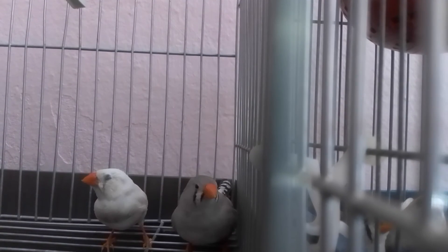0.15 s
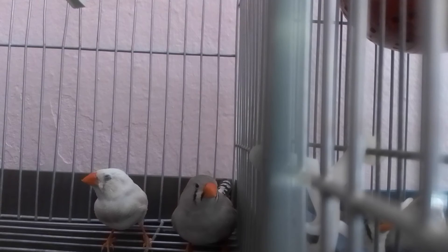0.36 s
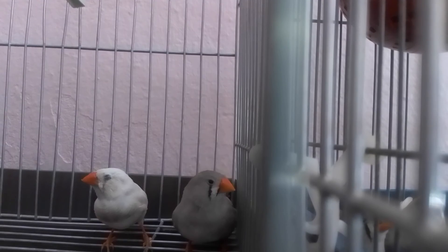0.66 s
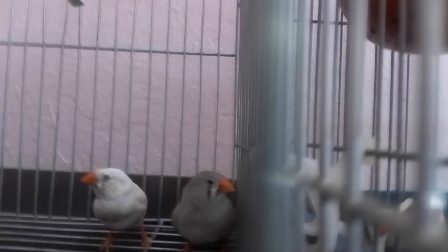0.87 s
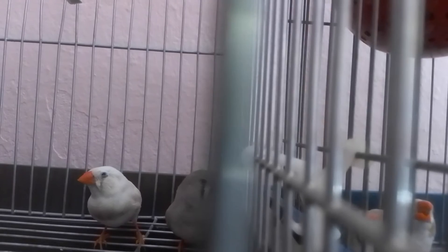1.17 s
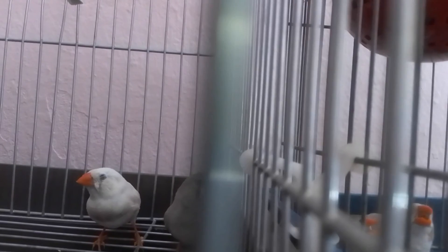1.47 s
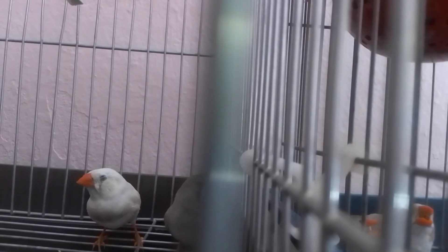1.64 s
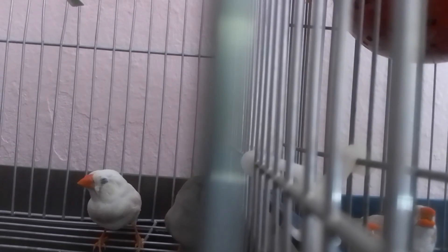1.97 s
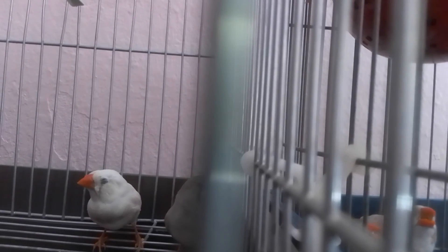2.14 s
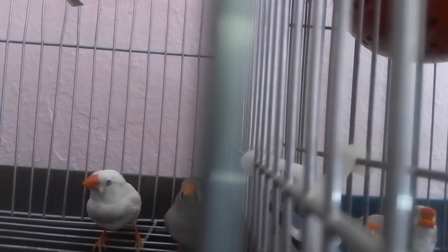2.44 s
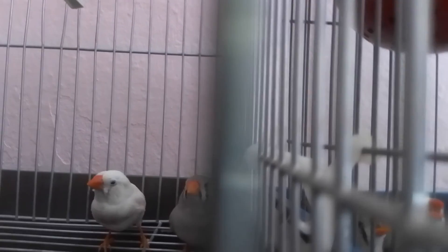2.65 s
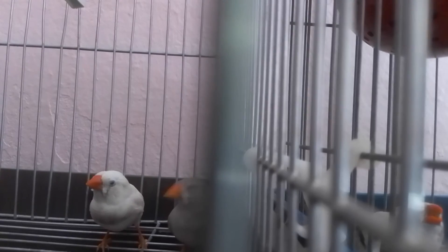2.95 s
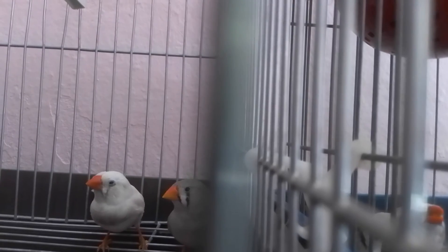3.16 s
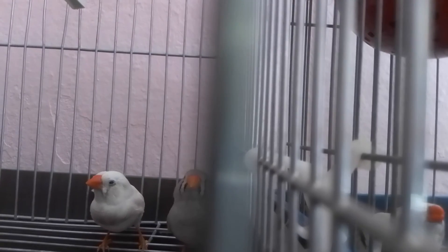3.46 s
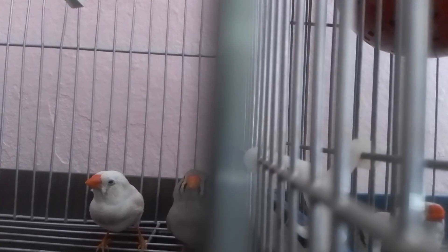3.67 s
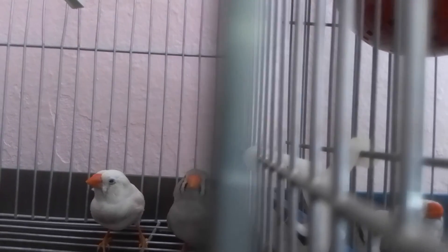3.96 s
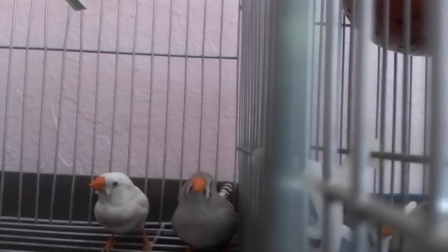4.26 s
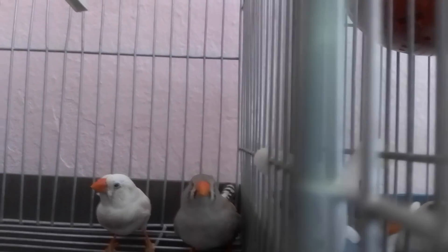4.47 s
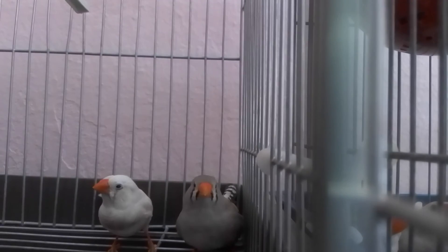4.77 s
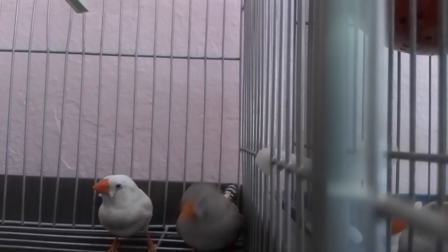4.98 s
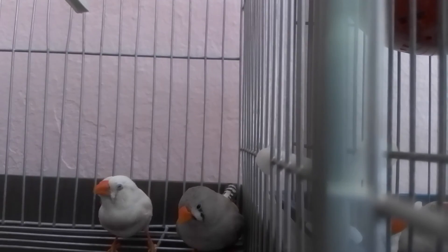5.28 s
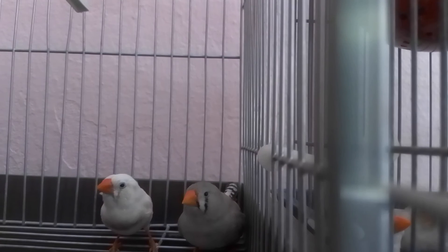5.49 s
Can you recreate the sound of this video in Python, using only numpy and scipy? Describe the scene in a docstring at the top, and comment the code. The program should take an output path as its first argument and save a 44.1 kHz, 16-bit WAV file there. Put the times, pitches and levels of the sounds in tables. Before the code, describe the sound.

Zebra finches in a cage call inside a small, echoing room. A nasal chirp is cut off at the start, then faint peeps and hoarse buzzes come from further away. A chirp near two seconds leads into a cluster of rasps; more separate chirps follow, and a loud close call ends it. Steady soft hiss and low rumble lie underneath.

```python
"""Zebra finches in a cage in a small, hard-walled room, over steady noise, a swelling rumble and a brief hum.
A short nasal chirp is already sounding at the start; then thin peeps and hoarse, buzzy calls come from further off.
A chirp near 2 s leads to a cluster of peeps and hoarse calls, with a soft rush of noise behind them.
Three more chirps follow, with a peep and a hoarse call between, and one long, loud call close by ends the scene.
Calls are syrinx pulses on a moving pitch, coloured by throat and beak; peeps are pairs of rasping tones."""
import sys
import numpy as np
from scipy import signal
from scipy.fft import rfft, irfft, next_fast_len
from scipy.io import wavfile
from scipy.ndimage import uniform_filter1d, map_coordinates

SR = 44100
rng = np.random.default_rng(int(sys.argv[2]) if len(sys.argv) > 2 else 0)


def dump(signal):
    """Clip the signal to [-1, 1] and save it as 16-bit WAV at the path in sys.argv[1]."""
    limited = np.clip(np.atleast_2d(signal).T, -1, 1)
    pcm = np.round(limited * 32767).astype(np.int16)
    wavfile.write(sys.argv[1], SR, pcm)


N = 247842  # length in samples

# The short chirps. Each row: start in seconds, lead-in in seconds, length in seconds, pitch in Hz,
# sag of the pitch in Hz per second, level in dB, lead-in level in dB relative to that, base roughness 0-1,
# delay of the shrill flare in seconds, flare in dB, whistle lift in dB, spread of the pulses in radians,
# cage echoes in dB, room ring in dB (both relative to the direct sound's gain).
CHIRP_ROWS = [(-.045, .015, 0.065, 567, 403, -33, -8, 0.28, 0.014, -1, 7, 1.4, -4.5, -9),
              (1.96, 0.022, 0.053, 549, 4, -39.5, -7, 0.22, .007, 32.5, 8.5, 3.3, 3.5, -11),
              (3.164, 0.021, .06, 580.7, -260, -31, -13.5, 0.15, 0.032, 12.5, 8, 1.75, -4, -13),
              (4.33, 0.014, 0.072, 567.7, 222, -33, -9.5, 0.21, .019, 22, 0, 1.4, -8, -11.5),
              (5.004, 0.016, 0.073, 577.2, 498, -36.5, -7.5, 0.13, 0.041, 24, 24, 1.4, -8.5, -12)]
# Throat and beak, one table for each chirp. Each row: number of the harmonic, its relative level in dB.
CHIRP_THROAT_1 = [(1, -46.5), (2, -43.5), (3, -23.5), (4, -16.5), (5, -24.5), (6, -19), (7, -15.5),
                  (8, -9.5), (9, -23), (10, -28.5), (11, -26), (12, -28), (13, -35), (14, -42), (15, -44),
                  (16, -41)]
CHIRP_THROAT_2 = [(1, -56), (2, -60), (3, -24), (4, -3.5), (5, -8.5), (6, -8), (7, -5.5), (8, 4), (9, -20),
                  (10, -21), (11, -22), (12, -31), (13, -36), (14, -43)]
CHIRP_THROAT_3 = [(1, -41.5), (2, -23), (3, -21), (4, -16), (5, -12.5), (6, -22), (7, -5), (8, -25),
                  (9, -24), (10, -31), (11, -37), (12, -34.5), (13, -31.5), (14, -46), (15, -46), (16, -55)]
CHIRP_THROAT_4 = [(1, -34), (2, -31), (3, -17), (4, -9), (5, -7.5), (6, -11.5), (7, -0.5), (8, 2),
                  (9, -12.5), (10, -8), (11, -6.5), (12, -8), (13, -16), (14, -26.5), (15, -34), (16, -36),
                  (17, -32)]
CHIRP_THROAT_5 = [(1, -51), (2, -20.5), (3, -4.5), (4, -0.5), (5, -3.5), (6, -7.5), (7, 1.5), (8, -1),
                  (9, -8.5), (10, -8), (11, -34), (12, -50), (13, -37), (14, -44), (15, -32), (16, -30)]
CHIRP_THROATS = (CHIRP_THROAT_1, CHIRP_THROAT_2, CHIRP_THROAT_3, CHIRP_THROAT_4, CHIRP_THROAT_5)
ONSET_S, ONSET_DB, SWELL_S = 0.013, -18, 0.016  # how the level comes up
RELEASE_S, RELEASE_DB = 0.016, 17  # how long the ending lasts and how far the level falls
RISE_S, SCOOP, DROP = 0.034, 0.19, 0.095  # time of the pitch scoop; scoop and final drop as shares of the pitch
EDGE_ROUGH = 1.9  # extra roughness while the voice starts and stops, as a multiple
SHRILL_DB, END_FLARE_DB, FLARE_S = -7.5, 14.5, 0.011  # upper resonance at rest, its end flare, flare width
DIP_DB, DIP_BEFORE_S, DIP_WIDTH_S = 5, 0.011, 0.0059  # the voice slackens just before its last push


def chirps():
    """Each chirp scoops up in pitch through a soft lead-in, comes to full voice, then drops away."""
    track = np.zeros(N)
    for row, throat in zip(CHIRP_ROWS, CHIRP_THROATS):
        (start, lead, length, hz, sag, db, lead_db, rough,
         flare_s, flare_db, whistle_db, smear, near_db, tail_db) = row
        # a start before zero means the chirp is already under way
        t = np.arange(max(-start, 0), length + RELEASE_S, 1 / SR)
        rising = 1 - ease(t / RISE_S)
        release = np.maximum(t - length, 0) / RELEASE_S

        pitch = hz - sag * np.maximum(t - RISE_S, 0)
        pitch = pitch * (1 - SCOOP * rising - DROP * release)

        level_db = db + ONSET_DB * (1 - ease(t / ONSET_S))
        level_db = level_db + lead_db * (1 - ease((t - lead) / SWELL_S))
        level_db = level_db - RELEASE_DB * release
        level_db = level_db - DIP_DB * bell(t, length - DIP_BEFORE_S, DIP_WIDTH_S)

        shrill_db = SHRILL_DB + flare_db * bell(t, flare_s, FLARE_S)
        shrill_db = shrill_db + END_FLARE_DB * ease((t - length) / FLARE_S + .5)
        roughness = rough * (1 + EDGE_ROUGH * (rising + release))
        voice = call(start, pitch, level_db, roughness, shrill_db, throat, whistle_db, smear)
        track += in_room(voice, near_db, tail_db)
    return track


# The path of the long call. Each row: time in seconds, pitch in Hz, level in dB.
LONG_CALL_PATH = [(5.384, 542, -36), (5.394, 637, -26), (5.4, 662, -27), (5.422, 693, -23.5),
                  (5.476, 706.5, -23.5), (5.54, 681.4, -24.5), (5.598, 650.6, -29.5), (5.604, 584, -28),
                  (5.612, 558, -41)]
# Its throat and beak. Each row: number of the harmonic, its relative level in dB.
LONG_CALL_THROAT = [(1, -25), (2, -18.5), (3, -28.5), (4, -20.5), (5, -8.5), (6, -9), (7, 0), (8, -4.5),
                    (9, -13), (10, -22.5), (11, -34.5), (12, -34.5), (13, -44.5), (14, -49), (15, -40.5),
                    (16, -54), (17, -48.5), (18, -44), (19, -40), (20, -55), (21, -54)]


def long_call(attack_s=0.0052, onset_db=-16, flare_at_s=0.012, flare_width_s=0.0039, flare_db=26,
              rest_db=-3, crest_db=14, crest_width_s=0.031, rough=0.032, flare_rough=0.52, slack_rough=0.4):
    """The close, loud call: a rough, shrill flare at the start, then a cleaner arch, brightened at its crest."""
    s, hz, db = np.transpose(LONG_CALL_PATH)
    t = np.arange(s[0], s[-1], 1 / SR)
    pitch = np.interp(t, s, hz)

    edges = ease((t - s[0]) / attack_s) * ease((s[-1] - t) / attack_s)
    level_db = np.interp(t, s, db) + onset_db * (1 - edges)

    flare = bell(t, s[0] + flare_at_s, flare_width_s)
    crest = bell(t, t[np.argmax(pitch)], crest_width_s)
    shrill_db = rest_db + flare_db * flare + crest_db * crest

    # the voice roughens where its pitch is low
    slack = np.maximum(1 - pitch / pitch.mean(), 0)
    roughness = rough + flare_rough * flare + slack_rough * slack
    return call(s[0], pitch, level_db, roughness, shrill_db, LONG_CALL_THROAT, whistle_db=6.5, smear=.1,
                whistle_hz=1200, whistle_width_hz=360, shrill_hz=6640)


def call(start, pitch, level_db, rough, shrill_db, throat, whistle_db, smear, whistle_hz=2070,
         whistle_width_hz=210, sag=0.03, shrill_hz=6800, shrill_width_hz=520):
    """A clear call: syrinx pulses through the throat, whose upper resonance follows shrill_db."""
    held_hz = np.average(pitch, weights=amp(2 * level_db))
    spectrum = [(k * held_hz, db) for k, db in throat]
    spectrum = [(held_hz / 2, -60)] + spectrum + [((len(throat) + 2) * held_hz, -64)]
    voice = resonate(syrinx(pitch, rough, smear), spectrum)

    # where the pitch sags, two bands an octave apart change level by whistle_db
    pinch = amp(whistle_db * np.clip((1 - pitch / held_hz) / sag, 0, 1)) - 1
    whistle = filtered(voice, lambda hz: bell(hz, whistle_hz, whistle_width_hz)
                       + bell(hz, 2 * whistle_hz, whistle_width_hz))
    shrill = filtered(voice, lambda hz: bell(hz, shrill_hz, shrill_width_hz))
    voice = voice + pinch * whistle + (amp(shrill_db) - 1) * shrill

    # the colour changes the timbre only; the breath of the bird sets the level
    power = uniform_filter1d(uniform_filter1d(voice ** 2, size=240), size=160)
    track = np.zeros(N)
    add(track, start, amp(level_db) * voice / np.sqrt(np.abs(power) + 1e-12))
    return track


def syrinx(pitch, rough, smear, jitter=0.0345, count=26):
    """One pulse a cycle, spread out by smear (radians); roughness unsettles the pitch and lets puffs of air by."""
    n = len(pitch)
    rough = np.clip(rough, 0, 1)
    unsteady_pitch = pitch * (1 + jitter * rough * wobble(433.6, n))
    phase = 2 * np.pi * np.cumsum(unsteady_pitch) / SR
    lag = smear * rng.standard_normal(count + 1)
    # each harmonic stops where it would pass half the sample rate
    pulses = unit(sum(np.cos(k * phase + lag[k]) * (k * pitch < SR / 2) for k in range(1, count + 1)))
    puffs = unit(rng.standard_normal(n) * (1 + np.cos(phase)))
    return np.sqrt(1 - rough ** 2) * pulses + rough * puffs


def resonate(x, spectrum, size=2048):
    """Causal colour from a minimum-phase filter: each pulse rings after it arrives."""
    gain = amp(along(spectrum, np.fft.rfftfreq(size, 1 / SR)))
    cepstrum = irfft(np.log(gain))
    # folding the second half onto the first keeps the ringing after the pulse
    cepstrum[1:size // 2] *= 2
    cepstrum[size // 2 + 1:] = 0
    ringing = irfft(np.exp(rfft(cepstrum)))
    return signal.fftconvolve(x, ringing)[:len(x)]


# The hoarse calls. Each row: start in seconds, swell in seconds, fade in seconds, level in dB before the mix,
# final tilt in dB per octave, extra level of the lowest resonance in dB, resonance favoured by the beak in Hz.
HOARSE_ROWS = [(.943, 0.0584, 0.0386, -47, 1.7, 2.5, 2530), (1.54, 0.014, 0.07, -63.5, -2.5, 9.5, 3500),
               (2.428, 0.0064, 0.047, -46.5, -2.5, -9, 2400), (2.556, 0.032, 0.035, -46.5, -4, -8, 1680),
               (2.609, 0.0084, 0.088, -49.5, 0.5, -1, 4340), (2.77, 0.013, .034, -60.5, -6.5, -10, 4130),
               (4.071, 0.0145, 0.0311, -43, -0.9, -6, 2400)]
# The resonances they ring in. Each row: centre in Hz, width in Hz, level in dB before tilt and beak.
HOARSE_RESONANCES = [(1002, 66, 14), (1685, 380, 3.5), (2093, 110, 6), (2520, 210, 1), (2960, 300, -8),
                     (3440, 56, -4), (4154, 580, 3.5), (4420, 110, -14.5), (5270, 280, -19.5),
                     (5840, 220, -4), (6590, 420, -6.5), (7340, 280, -15)]
HOARSE_HZ, HOARSE_ROUGH = 588, 0.79  # top pitch before jitter, and roughness 0-1
LEAD_S, LEAD_DB = 0.036, -17  # the thin lead-in before each hoarse call
BRIGHT_DB, DARKEN_S = 7.5, 0.055  # extra tilt per octave at the start; gone this long after the swell
BEAK_DB, BEAK_WIDTH_HZ = 3, 240  # lift and width of the favoured resonance


def hoarse_calls(arch=0.0609, patchy_db=3.5, patch_rate=45, grain_db=2.5, grain_rate=300):
    """Rasping calls: air chopped at an arched pitch, sputtering through resonances; they start thin and darken."""
    track = np.zeros(N)
    centres, widths, levels = np.transpose(HOARSE_RESONANCES)
    for s, swell, fade, db, tilt_db, low_db, beak_hz in HOARSE_ROWS:
        t = np.arange(-LEAD_S, swell + 2 * fade, 1 / SR)
        lead = amp(LEAD_DB) * ease(2 * (1 + t / LEAD_S))
        growing = lead + (1 - lead) * ease(t / swell)
        effort = np.where(t < swell, growing, np.exp(-((t - swell) / fade) ** 2))

        source = syrinx(HOARSE_HZ * (1 + arch * (effort - 1)), HOARSE_ROUGH, smear=1.57)
        source = source * amp(grain_db * wobble(grain_rate, len(t)))

        tilt = tilt_db + BRIGHT_DB * (1 - ease(t / (swell + DARKEN_S)))
        octaves = np.log2(centres / centres[0])
        colour_db = levels + BEAK_DB * bell(centres, beak_hz, BEAK_WIDTH_HZ)
        gains = amp(colour_db[:, None] + octaves[:, None] * tilt)
        gains[0] *= amp(low_db)
        gains /= np.sqrt(widths @ gains ** 2)

        # as throat and beak move, each resonance flares and fades on its own
        voice = np.zeros(len(t))
        for c, w, g in zip(centres, widths, gains):
            ringing = filtered(source, lambda hz: 1 / (1 + (2 * (hz - c) / w) ** 2))
            voice += g * amp(patchy_db * wobble(patch_rate, len(t))) * ringing
        add(track, s - LEAD_S, amp(db) * effort * unit(voice))
    return track


# The two-voiced peeps. Each row: start in seconds, length in seconds, pitch in Hz, level in dB before the mix,
# second pitch in Hz, second level in dB before the mix, rasp as a share of the pitch.
PEEP_ROWS = [(0.271, 0.018, 1677, -52, 2340, -62, 0.019), (0.28, 0.062, 2324, -60.5, 1694, -60, 0.06),
             (0.856, 0.025, 4080, -61, 3560, -63, 0.022), (0.928, 0.095, 5900, -54.5, 4050, -61, 0.026),
             (1.373, 0.013, 6030, -48, 4340, -48.5, .045), (1.381, 0.047, 2296, -60, 4170, -87, 0.079),
             (1.53, 0.085, 2331, -56, 4010, -67, 0.058), (2.3, 0.021, 5960, -44.5, 4850, -54, 0.033),
             (2.413, 0.067, 2387, -54.5, 4050, -68, 0.093), (2.954, 0.013, 4170, -58, 4850, -77, 0.051),
             (4.035, 0.061, 4160, -57, 6360, -67, 0.013)]


def peeps(rasp_rate=1800):
    """Very short, thin notes with a rasping pitch, one tone from each side of the syrinx."""
    track = np.zeros(N)
    for s, length, first_hz, first_db, second_hz, second_db, rasp in PEEP_ROWS:
        n = int(length * SR)
        for hz, db in (first_hz, first_db), (second_hz, second_db):
            phase = 2 * np.pi * np.cumsum(hz * (1 + rasp * wobble(rasp_rate, n))) / SR
            tone = np.sin(phase) * signal.windows.tukey(n, .5)
            add(track, s, amp(db) * unit(tone))
    return track


# How long the room rings. Each row: frequency in Hz, time in seconds for the ring to fall by 60 dB.
WALL_RING = [(300, 0.83), (2000, 0.64), (4000, 0.47), (7000, 0.42), (14000, 0.073)]


def in_room(x, near_db, tail_db, near_t60=0.12, gap_s=0.004):
    """The direct sound, quick echoes from cage and wall, and the room's longer ring."""
    # the ring is noise that dies away at its own pace at each frequency
    hz, t, z = signal.stft(rng.standard_normal(SR), SR, nperseg=256)
    z = z * amp(-60 * t / along(WALL_RING, hz)[:, None])
    tail = signal.istft(z, SR, nperseg=256)[1][:SR]
    t = np.arange(SR) / SR
    tail = tail * (1 - np.exp(-t / 0.012))

    # the quick echoes are scattered, fading clicks
    scattered = rng.standard_normal(SR) * (rng.random(SR) < .02)
    near = scattered * amp(-60 * t / near_t60) * (t > gap_s)
    echoes = amp(tail_db) * tail / np.linalg.norm(tail) + amp(near_db) * near / np.linalg.norm(near)
    return x + signal.fftconvolve(x, echoes)[:N]


def wash(start=2.28, swell=0.38, fade=0.29, centre_hz=2200, width_hz=520, db=-58):
    """A soft, diffuse rush of band-limited noise that lingers behind the cluster of hoarse calls."""
    t = np.arange(N) / SR - start
    level = np.clip(t / swell, 0, 1) * np.exp(-np.maximum(t - swell, 0) / fade)
    rush = unit(filtered(rng.standard_normal(N), lambda hz: bell(hz, centre_hz, width_hz)))
    return amp(db) * level * rush


def drone(hz=101, middle=2.5, spread=0.25, db=-68):
    """A faint low hum, a sine with a wavering phase, that comes and goes."""
    t = np.arange(N) / SR
    hum = unit(np.sin(2 * np.pi * hz * t + .7 * wobble(7.1, N)))
    return amp(db) * bell(t, middle, spread) * hum


# The colour of the steady room noise. Each row: frequency in Hz, relative level in dB per Hz.
FLOOR_COLOUR = [(20, -17.5), (60, -10), (105, -2), (240, 0.5), (400, -3.5), (620, -5.5), (1000, -11),
                (2200, -17), (5000, -22), (5850, -18.5), (8000, -26.5), (11000, -28.5), (15500, -30)]
# The swells of the low rumble. Each row: middle in seconds, spread in seconds, level in dB.
RUMBLE_SWELLS = [(.2, 0.1, -61), (.6, .2, -64.5), (4.4, 1, -69)]


def room_floor(floor_db=-62.5, low_hz=175, octaves=0.85):
    """Steady noise and hiss, with low-pitched noise that swells and sinks as a rumble."""
    steady = unit(filtered(rng.standard_normal(N), lambda hz: amp(along(FLOOR_COLOUR, hz))))
    low = unit(filtered(rng.standard_normal(N),
                        lambda hz: np.exp(-(np.log2((hz + 1) / low_hz) / octaves) ** 2)))
    t = np.arange(N) / SR
    swelling = sum(amp(db) * bell(t, middle, spread) for middle, spread, db in RUMBLE_SWELLS)
    return amp(floor_db) * steady + low * swelling


def amp(db):
    """Decibels to gain."""
    return 10 ** (np.asarray(db) / 20)


def unit(x):
    """x at rms 1."""
    return x / np.sqrt(np.mean(x ** 2) + 1e-20)


def ease(x):
    """A smooth step from 0 to 1 as x goes from 0 to 1."""
    return np.sin(np.pi / 2 * np.clip(x, 0, 1)) ** 2


def bell(x, centre, width):
    """A smooth peak of height 1, over time or frequency."""
    return np.exp(-.5 * ((x - centre) / width) ** 2)


def wobble(rate, n):
    """A smooth random curve, rate knots a second."""
    knots = rng.standard_normal(int(n * rate / SR) + 4)
    return map_coordinates(knots, [np.arange(n) * rate / SR])


def along(points, hz):
    """(Hz, value) points read on a log axis."""
    f, v = np.transpose(points)
    return np.interp(np.log(hz + 1), np.log(f + 1), v)


def filtered(x, gain):
    """x times a gain that depends on frequency."""
    m = next_fast_len(len(x) + 8192)
    return irfft(rfft(x, m) * gain(np.fft.rfftfreq(m, 1 / SR)), m)[:len(x)]


def add(track, s, sound):
    """Mix a sound into the track from time s (seconds) on."""
    part = track[max(0, round(s * SR)):][:len(sound)]
    part += sound[:len(part)]


def scene():
    """All birds in the room, each kind with its own share of echo and ring, over the background."""
    birds = (chirps()
             + in_room(long_call(), near_db=-20.0, tail_db=-14.5)
             + amp(-0.5) * in_room(hoarse_calls(), near_db=-10.0, tail_db=-8)
             + amp(-6.0) * in_room(peeps(), near_db=-9.0, tail_db=-12.5))
    return (birds + wash() + room_floor() + drone())[None]


def record(dry, top_hz=15800):
    """A sharp band limit: nothing is kept from top_hz upward."""
    return np.array([filtered(channel, lambda hz: hz < top_hz) for channel in dry])


dry = scene()
out = record(dry)
dump(out)
```